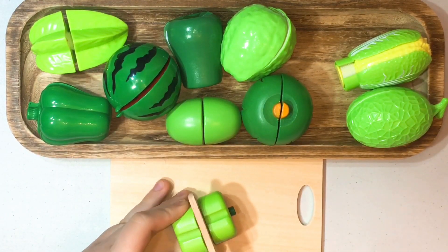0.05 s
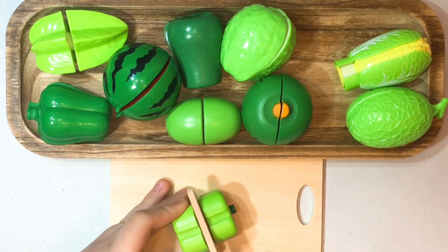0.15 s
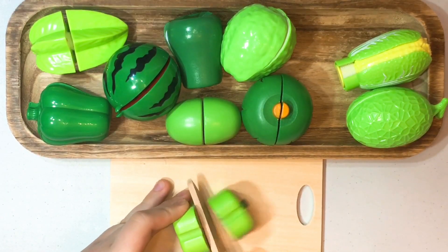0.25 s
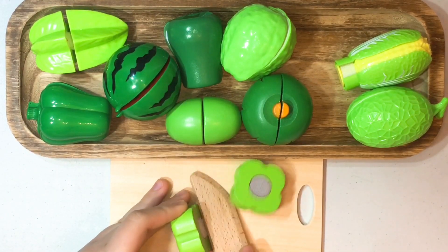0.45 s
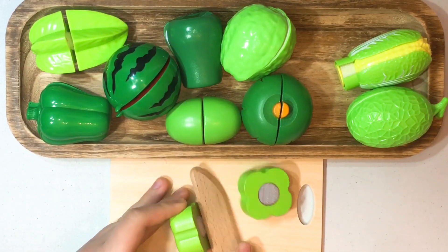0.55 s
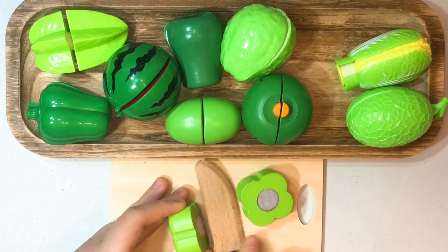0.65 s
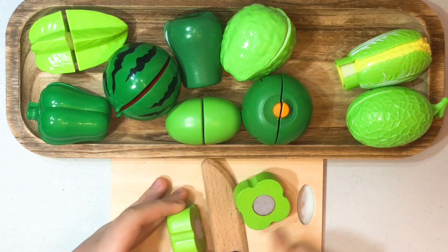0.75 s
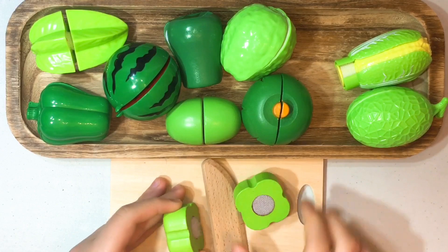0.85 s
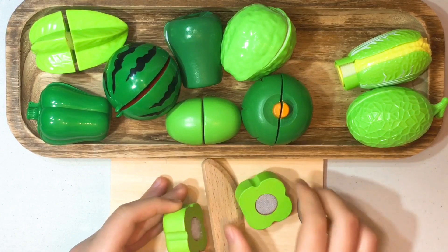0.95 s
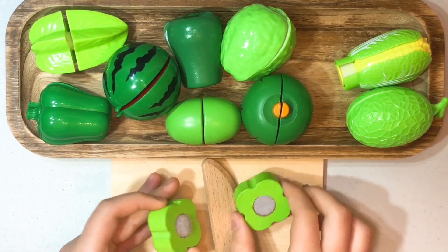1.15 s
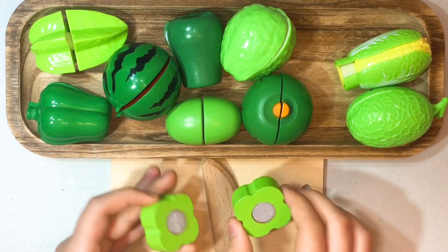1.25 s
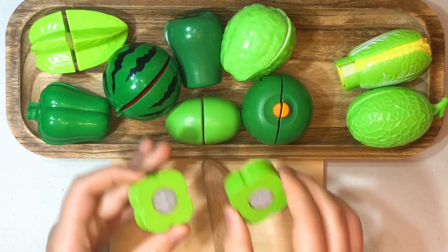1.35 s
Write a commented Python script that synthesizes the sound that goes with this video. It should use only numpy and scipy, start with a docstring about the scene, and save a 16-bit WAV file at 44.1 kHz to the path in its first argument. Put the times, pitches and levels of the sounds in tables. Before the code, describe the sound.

A wooden toy knife cuts through a toy pepper, the hook-and-loop pad crackling for the first 0.2 seconds before the blade hits the board with a sharp clack. From 0.4 seconds the freed half tumbles, lands with a hollow clack near 0.6 and rocks to rest. Faint dull nudges follow around 0.9 to 1.1 seconds, then a very faint sliding hiss near 1.4, in a small quiet room.

```python
"""A wooden toy knife is pressed through a toy pepper and strikes a small cutting board, in a small room.
First the hook-and-loop pad between the halves tears snap by snap; then the blade breaks through.
The freed half tumbles, slaps down on its flat side and rocks to rest. Each impact excites damped modes
of the body and of the board. Hands nudge the pieces and slide them together with a hiss of friction."""
import sys
import numpy as np
from scipy import signal
from scipy.fft import rfft, irfft, next_fast_len
from scipy.io import wavfile

SR = 44100
rng = np.random.default_rng(int(sys.argv[2]) if len(sys.argv) > 2 else 0)


def pcm_store(signal):
    """Save signal as 16-bit PCM."""
    levels = np.round(np.clip(np.atleast_2d(signal), -1, 1) * 32767)
    wavfile.write(sys.argv[1], SR, levels.astype(np.int16).T)


N = 61739
T = np.arange(SR // 2) / SR  # time axis of one contact

# blade impacts: start_s, ring_db, centre_hz, crack_db, thump_db
BLADE_IMPACTS = [(0.2267, -8, 4300, -5.5, -7.5), (0.2287, -8, 2130, -17, -36.5),
                 (0.2309, -7.5, 1900, -15, -28.5)]
# knife modes: pitch_hz, level_db, t60_s
KNIFE_MODES = [(396.5, -0.5, .02), (549, 4.5, .03), (1050, -1, 0.014), (1600, -7.5, 0.026),
               (2142, 1, 0.026), (2240, -24, .16), (2260, -4.5, 0.014), (2570, -5, .022), (3270, -2.5, .02),
               (3437, -10.5, .05), (3700, -9, 0.043), (4280, -10, 0.011), (5470, -13, 0.0063),
               (6050, -8.5, 0.03)]
# noise of a blade impact: frequency_hz, level_db
CRACK_SPECTRUM = [(30, -11), (100, -11.5), (350, -11.5), (900, -5), (2000, 1), (3800, 6), (6500, -5),
                  (10000, -13), (15500, -21.5)]
# strong hooks letting go: start_s, click_db, thump_db
HOOK_SNAPS = [(.008, -32, -30), (0.0268, -36, -32.5), (0.0368, -31, -34), (0.0394, -34.5, -39),
              (0.0493, -39.5, -46), (.0513, -36.5, -34.5), (0.0683, -39, -40), (0.0774, -36.5, -49),
              (0.0808, -32.5, -31.5), (0.1121, -33.5, -46), (0.1154, -35.5, -33.5), (0.1301, -41.5, -39.5),
              (0.137, -27, -24), (0.1399, -30.5, -28), (.143, -30, -36.5), (0.154, -29, -30),
              (0.1579, -31, -25.5), (0.1648, -30, -29), (.182, -31.5, -32.5), (0.1944, -27.5, -24),
              (.199, -26.5, -28)]
# crackle of the tearing pad: time_s, level_db
TEAR_ENVELOPE = [(0, -67.5), (.05, -54), (0.101, -72), (.13, -61), (0.144, -44), (.177, -56), (.197, -36.5),
                 (.225, -37), (0.243, -64.5)]
# noise of a hook: frequency_hz, level_db
HOOK_SPECTRUM = [(200, -7.5), (950, 4), (1400, -5), (2200, 2), (3200, -4), (5000, 2), (7500, -6.5),
                 (9800, -1), (15500, -5.5)]
# edge impacts of the loose half: start_s, ring_db, centre_hz, click_db, thump_db
EDGE_IMPACTS = [(.4011, -11.5, 3650, -26.5, -36), (0.4076, -29, 5500, -22, -28.5),
                (0.4457, -15, 1980, -31, -30.5), (0.4598, -32.5, 2094, -30.5, -40),
                (0.478, -34, 2050, -46.5, -29.5), (0.5414, -23, 2000, -42, -32.5),
                (.566, -24.5, 2250, -26, -25.5), (0.6367, -23, 2000, -26, -17.5),
                (.656, -40, 900, -54, -24.5), (0.707, -50, 1198, -63.5, -30), (.726, -46, 886, -57, -34.5)]
# modes of the half: pitch_hz, level_db, t60_s
HALF_MODES = [(1112, -12.5, .013), (1371, -9.5, 0.036), (1818, -21.5, 0.027), (2027, 1.5, 0.019),
              (2390, -11, .012), (3196, -3.5, 0.013), (3695, -7, 0.019), (4340, -8, .011),
              (4634, -13.5, .01), (5530, -14, .015), (6890, -16, .03)]
# contact noise of the half: frequency_hz, level_db
CLICK_SPECTRUM = [(40, -29.5), (150, -22), (700, 6.5), (2200, 8), (4500, 1), (7000, -6), (10000, -22),
                  (15500, -31)]
# impacts of the flat side: start_s, ring_db, click_db, thump_db
FLAT_IMPACTS = [(.5841, -31, -18.5, -30.5), (.5860, -16, -21, -19.5)]
# modes of the flat side on the board: pitch_hz, level_db, t60_s
FLAT_MODES = [(235, -8, 0.02), (357, -1, .025), (535, -6, 0.045), (661, 1.5, 0.026), (773, 5, 0.018),
              (1108, 0, .019), (1316, -4.5, 0.038), (1528, -9, 0.023), (1658, -6.5, 0.032),
              (2090, -5, .018), (2740, -2.5, 0.0096), (3627, -6, .03), (4715, -12, 0.015)]
# friction noise of the half: frequency_hz, level_db
SKID_SPECTRUM = [(40, -13.5), (300, 6), (600, 6), (3000, -2.5), (6000, -13), (9000, -19), (15000, -32)]
# nudges by the hands: start_s, knock_db, thump_db
HAND_NUDGES = [(.918, -47.5, -56), (.921, -54.5, -36), (1.027, -57, -42), (1.11, -52, -36),
               (1.137, -63.5, -47)]
# noise of a soft contact: frequency_hz, level_db
NUDGE_SPECTRUM = [(100, -13), (850, 12.5), (1400, -11.5), (2200, -5.5), (4000, -24), (12000, -35)]
# the halves sliding together: time_s, level_db
SLIDE_ENVELOPE = [(1.35, -80.5), (1.38, -62), (1.4, -68)]
# cutting board modes: pitch_hz, level_db, t60_s
BOARD_MODES = [(232.5, -5, 0.073), (274.1, 3, 0.054), (338.6, -2.5, 0.05), (455, -9, 0.039),
               (551, -16.5, 0.094), (654.3, -17.5, 0.075)]
# reverberation time: frequency_hz, t60_s
ROOM_DECAY = [(60, 0.18), (170, 0.12), (400, 0.5), (1000, 0.35), (2800, .36), (7000, 0.34), (14000, 0.17)]
# reverberation relative to the direct sound: frequency_hz, level_db
ROOM_SPECTRUM = [(60, 8), (170, -12.5), (300, -12), (700, -3), (1500, -6.5), (3000, -6.5), (7000, -5.5),
                 (14000, -6)]
# background noise of the room: frequency_hz, level_db
AIR_SPECTRUM = [(25, -15), (50, -1.5), (110, 0), (160, -3), (217, 4.5), (320, -11.5), (600, -15),
                (1500, -24), (3500, -28.5), (9000, -35.5), (15500, -39.5)]

CRACK_T60_S, SNAP_T60_S, CLICK_T60_S = 0.013, 0.0049, 0.014
RING_RISE_S, BOARD_RISE_S, BOARD_LAG_S, ROOM_RISE_S = 0.00022, 0.0025, 0.0018, 0.0036
HOOKS_PER_S = 900
SKID_MIDDLE_S, SKID_WIDTH_S, SKID_DB = 0.4638, 0.0037, -29
SLIDE_BAND_HZ = (3300, 11760)
ECHO_S, ECHO_DB, ECHO_HZ, ECHO_Q = 0.018, -8.5, 3380, 6.1
LOW_CUT_HZ = 150  # small bodies radiate little bass
AIR_DB, TOP_HZ = -59, 15780


def knife():
    """Impact excitation: the blade chatters on the board and its modes ring, the first touch brightest."""
    track = np.zeros(N)
    for start_s, ring_db, centre_hz, crack_db, thump_db in BLADE_IMPACTS:
        tone = amp(ring_db) * ring(favoured(KNIFE_MODES, centre_hz, octaves=0.75), RING_RISE_S)
        crack = amp(crack_db) * burst(CRACK_SPECTRUM, CRACK_T60_S)
        track += on_board(start_s, tone + crack, thump_db)
    return track


def tearing_pad():
    """Elastic release: strong hooks snap and jolt the board over a swelling crackle of small ones."""
    hooks = (rng.random(N) < HOOKS_PER_S / SR) * rng.standard_normal(N)
    grain = rng.standard_normal(len(T)) * fade(T, t60=0.0044)
    grains = signal.fftconvolve(hooks, grain)[:N]
    level_db = np.interp(np.arange(N) / SR, *np.transpose(TEAR_ENVELOPE), right=-np.inf)
    track = in_room(coloured(grains, HOOK_SPECTRUM) * amp(level_db))
    for start_s, click_db, thump_db in HOOK_SNAPS:
        track += on_board(start_s, amp(click_db) * burst(HOOK_SPECTRUM, SNAP_T60_S), thump_db)
    return track


def tumbling_half():
    """Selective excitation: each edge that touches down favours its own range of the half's modes."""
    track = np.zeros(N)
    for start_s, ring_db, centre_hz, click_db, thump_db in EDGE_IMPACTS:
        tone = amp(ring_db) * ring(favoured(HALF_MODES, centre_hz, octaves=0.36), RING_RISE_S)
        click = amp(click_db) * burst(CLICK_SPECTRUM, CLICK_T60_S)
        track += on_board(start_s, tone + click, thump_db)
    return track


def flat_landing():
    """Damped resonance: the flat side meets the board and lower modes give a hollow clack."""
    track = np.zeros(N)
    for start_s, ring_db, click_db, thump_db in FLAT_IMPACTS:
        tone = amp(ring_db) * ring(FLAT_MODES, RING_RISE_S)
        click = amp(click_db) * burst(CLICK_SPECTRUM, CLICK_T60_S)
        track += on_board(start_s, tone + click, thump_db)
    return track


def skid():
    """Sliding friction: the half scrapes the board briefly between two tumbles."""
    stroke = np.exp(-0.5 * ((np.arange(N) / SR - SKID_MIDDLE_S) / SKID_WIDTH_S) ** 2)
    return in_room(amp(SKID_DB) * stroke * coloured(rng.standard_normal(N), SKID_SPECTRUM))


def nudges():
    """Soft contact excites little treble: the hands take hold of the halves with dull knocks."""
    return sum(on_board(start_s, amp(knock_db) * burst(NUDGE_SPECTRUM, t60=0.039), thump_db)
               for start_s, knock_db, thump_db in HAND_NUDGES)


def sliding_halves():
    """Light friction: a faint band of noise as the hands slide the halves together."""
    band = signal.butter(2, SLIDE_BAND_HZ, "band", fs=SR, output="sos")
    hiss = unit(signal.sosfilt(band, rng.standard_normal(N)))
    level_db = np.interp(np.arange(N) / SR, *np.transpose(SLIDE_ENVELOPE), left=-np.inf)
    return hiss * amp(level_db)


def on_board(start_s, contact, thump_db):
    """Mechanical coupling: a contact drives the board's low modes, and both sound in the room."""
    sound, track = contact.copy(), np.zeros(N)
    add(sound, BOARD_LAG_S, amp(thump_db) * ring(BOARD_MODES, BOARD_RISE_S, alternate=False))
    add(track, start_s, in_room(sound))
    return track


def in_room(direct):
    """Reflection adds a diffuse decaying tail and one bright echo from a hard surface nearby."""
    hz, t, noise = signal.stft(rng.standard_normal(len(T)), SR, nperseg=256)
    t60 = along(ROOM_DECAY, hz)[:, None]
    unit_energy = np.sqrt(2 * np.log(1000) / (t60 * SR))
    gain = amp(along(ROOM_SPECTRUM, hz))[:, None] * unit_energy
    tail = signal.istft(noise * gain * fade(t, t60), SR, nperseg=256)[1][:len(T)]
    tail *= 1 - np.exp(-(T / ROOM_RISE_S) ** 2)
    heard = direct + signal.fftconvolve(direct, tail)[:len(direct)]
    echo = signal.lfilter(*signal.iirpeak(ECHO_HZ, ECHO_Q, fs=SR), direct)
    add(heard, ECHO_S, amp(ECHO_DB) * echo)
    return heard


def room_air():
    """Stationary noise: the quiet air of the room, strongest in the bass."""
    return amp(AIR_DB) * coloured(rng.standard_normal(N), AIR_SPECTRUM)


def ring(modes, rise_s, alternate=True, scatter_db=2.6, detune=0.01):
    """Free vibration is a sum of damped sinusoids, here slightly varied at every blow."""
    hz, db, t60 = np.transpose(modes)[:, :, None]
    level_draw, pitch_draw = rng.standard_normal((2, len(hz), 1))
    sign = (-1) ** np.arange(len(hz))[:, None] if alternate else 1
    gain = sign * amp(db + scatter_db * level_draw)
    waves = gain * np.sin(2 * np.pi * hz * (1 + detune * pitch_draw) * T) * fade(T, t60)
    low_cut = signal.butter(2, LOW_CUT_HZ, "high", fs=SR, output="sos")
    return signal.sosfilt(low_cut, waves.sum(0) * (1 - np.exp(-T / rise_s)))


def favoured(modes, centre_hz, octaves):
    """Modal weighting: amplitude halves at the given number of octaves from the centre."""
    return [(hz, db - 20 * np.log10(1 + (np.log2(hz / centre_hz) / octaves) ** 2), t60)
            for hz, db, t60 in modes]


def burst(spectrum, t60, rise_s=0.00006):
    """A brief contact has a broad spectrum: noise with a fast rise and decay."""
    noise = coloured(rng.standard_normal(len(T)), spectrum)
    return noise * fade(T, t60) * (1 - np.exp(-(T / rise_s) ** 2))


def coloured(x, spectrum):
    """Spectral shaping: x filtered by a level curve, at rms 1."""
    size = next_fast_len(len(x) + 4096)
    gain = amp(along(spectrum, np.fft.rfftfreq(size, 1 / SR)))
    return unit(irfft(rfft(x, size) * gain, size)[:len(x)])


def along(points, hz):
    """Interpolation on a logarithmic frequency axis."""
    frequencies, values = np.transpose(points)
    return np.interp(np.log(hz + 1), np.log(frequencies + 1), values)


def fade(t, t60):
    """Exponential decay, 60 dB in t60 seconds."""
    return np.exp(-np.log(1000) * t / t60)


def amp(db):
    """Decibels to amplitude ratio."""
    return 10 ** (np.asarray(db) / 20)


def unit(x):
    """Normalisation to rms 1."""
    return x / np.sqrt(np.mean(x ** 2) + 1e-20)


def add(track, start_s, sound):
    """Superpose a delayed sound on the track."""
    part = track[max(round(start_s * SR), 0):][:len(sound)]
    part += sound[:len(part)]


def scene():
    """Superposition: all contacts add over the quiet air of the room."""
    air = room_air()
    cut = tearing_pad() + knife()
    fall = tumbling_half() + skid() + flat_landing()
    hands = nudges() + sliding_halves()
    return (cut + fall + hands + air)[None]


def record(dry):
    """Soft saturation rounds peaks at full scale; nothing passes above the band limit."""
    rounded = dry / (1 + dry ** 6) ** (1 / 6)
    size = next_fast_len(N + SR // 2)
    passband = np.fft.rfftfreq(size, 1 / SR) < TOP_HZ
    return irfft(rfft(rounded, size) * passband, size)[..., :N]


dry = scene()
out = record(dry)
pcm_store(out)
```